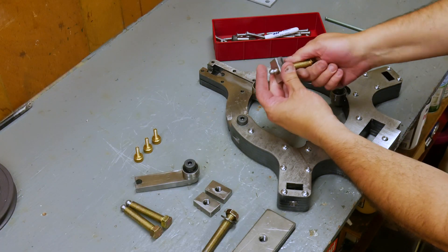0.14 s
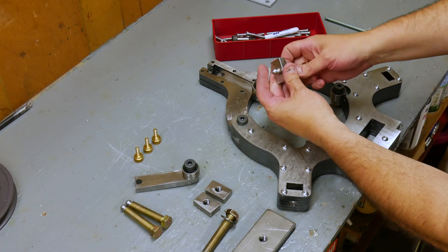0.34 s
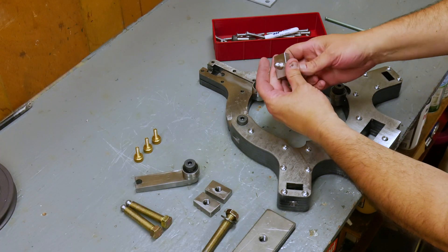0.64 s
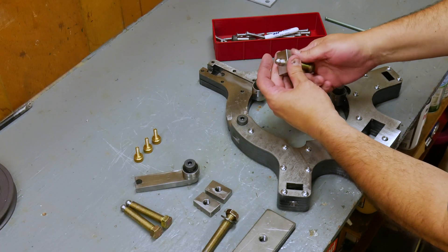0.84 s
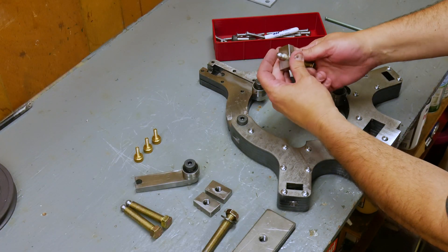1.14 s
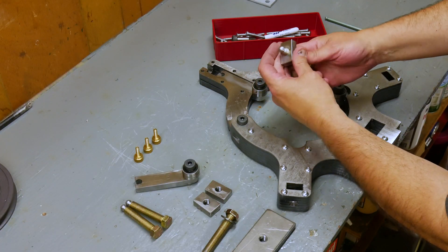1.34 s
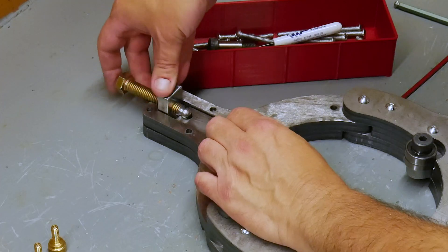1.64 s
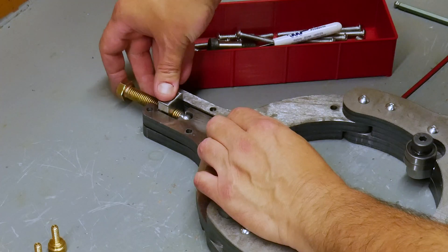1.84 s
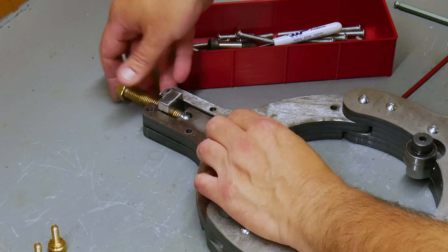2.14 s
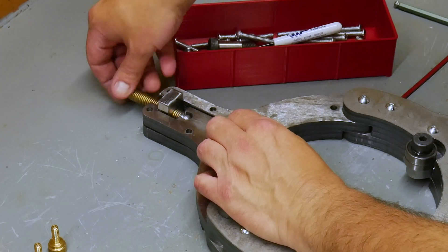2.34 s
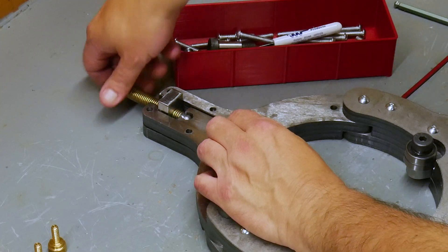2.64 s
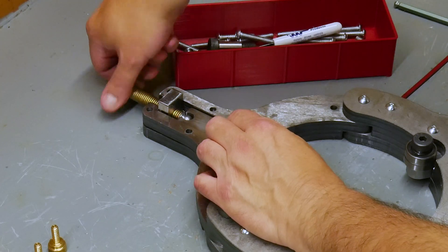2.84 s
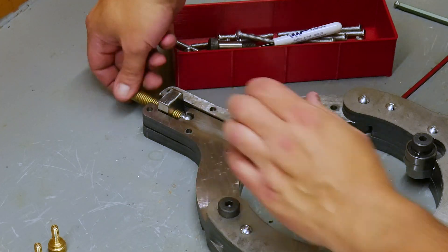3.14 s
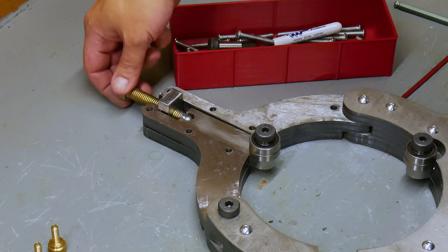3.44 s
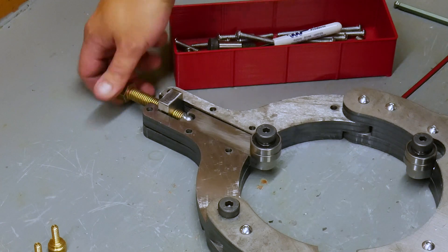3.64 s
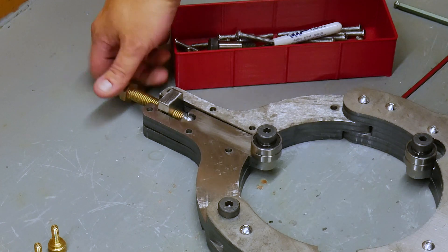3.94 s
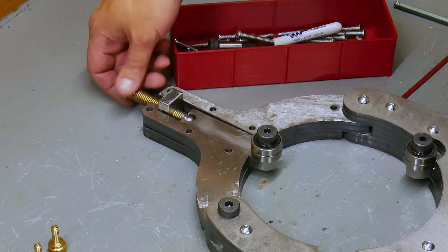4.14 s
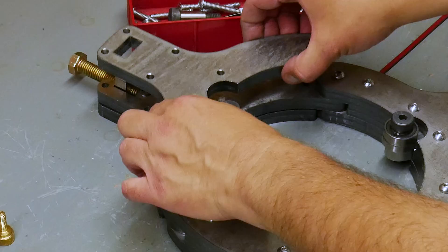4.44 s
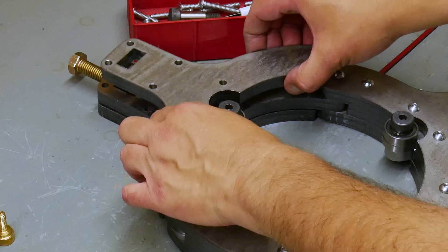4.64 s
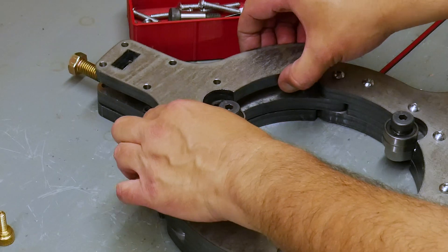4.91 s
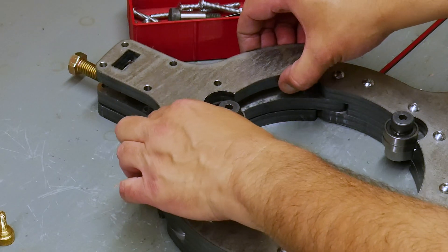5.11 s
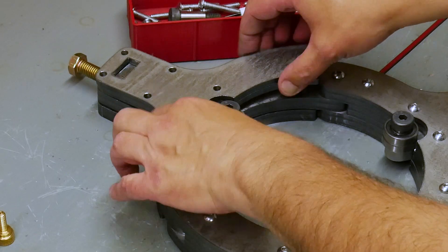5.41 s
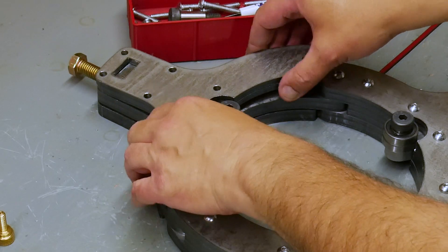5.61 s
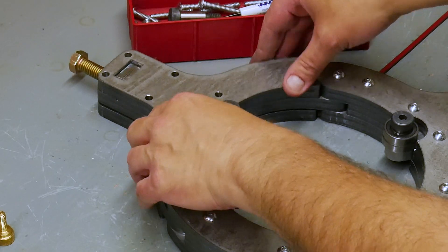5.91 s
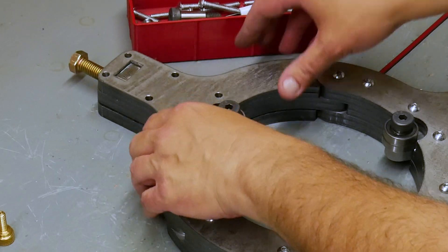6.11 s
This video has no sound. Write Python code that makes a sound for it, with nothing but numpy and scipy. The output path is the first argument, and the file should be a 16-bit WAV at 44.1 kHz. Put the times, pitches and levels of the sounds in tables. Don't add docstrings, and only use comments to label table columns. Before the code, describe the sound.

Close, nearly mono sound of hand assembly on a workbench: faint thread ticks, then one hard metal clank with a bench thud under suddenly louder ventilation noise. Light clicks and dull taps of the bolt cluster afterwards. When the air drops again, a heavy cover plate clatters and rings in two main bursts, its ring damped by gripping hands. Short indoor decay.

```python
import sys
import numpy as np
from scipy import signal
from scipy.fft import rfft, irfft
from scipy.io import wavfile
from scipy.ndimage import uniform_filter1d

SR = 44100
rng = np.random.default_rng(int(sys.argv[2]) if len(sys.argv) > 2 else 0)


def pcm_store(signal):
    levels = np.round(np.clip(np.atleast_2d(signal), -1, 1) * 32767)
    wavfile.write(sys.argv[1], SR, levels.astype(np.int16).T)


def nominal_scale(level):
    x = np.asarray(level, float) / 20
    return 10 ** x


N = 276507

# start in seconds, gain of the workshop air in dB.
SHOTS = [
    (0, -0.5),
    (1.51, 11),
    (4.5151, -0.35),
]
# start in seconds, levels of crack, block ring and shank ring in dB.
BOLT_HITS = [(0.78, -69, -57, -65), (1.274, -61, -54, -63), (1.9475, -52, -66, -45), (2.541, -61, -47, -40),
             (2.554, -45, -46, -51), (2.8759, -52, -54, -38), (2.9228, -54, -54, -40),
             (3.2093, -46, -50, -50), (3.2206, -41.5, -24, -36), (3.271, -43, -47, -31),
             (3.357, -51, -56, -56), (3.5393, -50, -55, -44), (3.6064, -38, -57, -27),
             (3.677, -46.5, -57, -50), (3.8164, -46, -42, -35.5), (3.848, -64, -45, -46),
             (3.8655, -40, -35.5, -42), (3.88, -46, -49, -45), (3.9253, -44.5, -54, -38),
             (4.1297, -43.5, -33, -36), (4.15, -44, -43, -51), (4.1634, -57, -53, -36),
             (4.2164, -45, -38, -40), (4.241, -47, -28, -38), (4.269, -57, -50, -38),
             (4.3385, -51, -55, -54), (4.471, -57, -45, -56), (4.4787, -45, -40.5, -34),
             (4.493, -57, -56, -32.5)]
# start in seconds, levels of crack, block ring and edge ring in dB,
# chatter in seconds.
DROP_HITS = [
    (1.7592, -46, -35, -70, .008),
    (1.7779, -21, -10, -45, .004),
    (1.7858, -29, -34, -36, .005),
]
# middle in seconds, length in seconds, rms level in dB.
TURNS = [
    (.145, .07, -75),
    (.475, .06, -72),
    (.775, .05, -71),
    (1.055, .07, -72),
    (3.57, .05, -60),
]
# start in seconds, ring level in dB, treble of the ring in dB, grip damping factor.
PLATE_HITS = [(4.634, -38, -18, 1.8), (4.9326, -36.5, -27, 3.9), (5.012, -61, -37, 2.1),
              (5.035, -50, -35, 2.9), (5.2314, -39.5, -23, 2.2), (5.3688, -38, -23.5, 1.2),
              (5.3877, -27.5, -17, 1.3), (5.4067, -19, -12, 3.4), (5.4138, -15.5, -39, 2.8),
              (5.421, -27, -6, 1.6), (5.4277, -28.5, -19, 3.1), (5.444, -37.5, -10, 3.3),
              (5.804, -49, -29, 1.9), (5.8313, -41, -18, 1.7), (5.8609, -26, -8, 3.5),
              (5.8687, -28, -40, 1.6), (5.8865, -28, -27, 2.9), (5.947, -22, -17, 3.2),
              (5.9822, -18.5, -12.5, 3.7)]
# start in seconds, level in dB, favoured pitch in Hz, chatter in seconds.
THUDS = [(1.7752, -9, 223, 0.0011), (2.546, -32.5, 590, 0.011), (2.889, -30, 148, 0.016),
         (3.218, -27, 406, 0.006), (3.25, -31, 175, 0.0053), (3.271, -31, 266, 0.0062),
         (3.522, -26.5, 288, 0.041), (3.551, -42, 292, 0.018), (3.599, -30, 510, 0.007),
         (3.677, -33, 527, 0.027), (3.85, -29, 536, 0.011), (3.871, -30.5, 285, 0.026),
         (4.165, -27, 154, 0.04), (4.208, -27.5, 170, 0.037), (4.238, -32.5, 388, 0.011),
         (4.478, -33.5, 377, 0.0061), (4.631, -37, 495, 0.011), (4.738, -43, 344, 0.014),
         (4.93, -33, 176, 0.013), (5.037, -38, 267, 0.018), (5.226, -35, 385, 0.0094),
         (5.256, -34.5, 182, 0.012), (5.371, -25.5, 570, 0.061), (5.401, -22.5, 257, 0.025),
         (5.82, -34.5, 269, 0.011), (5.836, -36.5, 264, 0.012), (5.859, -24, 346, 0.016),
         (5.874, -28, 490, 0.0074), (5.957, -31.5, 255, 0.0028), (5.979, -28, 507, 0.022)]

# frequency in Hz, level in dB, t60 in seconds.
BLOCK_MODES = [(5720, 0, .03), (5810, -4, .04), (5100, -18, .02), (6400, -20, .02), (7300, -26, .03),
               (8300, -28, .03), (14900, -38, .04)]
EDGE_MODES = [(11200, -3, 0.11), (11470, -5.5, 0.088), (12300, -12, .08)]
SHANK_MODES = [(2997, 3, 0.024), (3454, -2, 0.022), (4450, -10, 0.045), (5226, -3.5, 0.0503),
               (2220, -9, 0.028)]
THREAD_MODES = [(5830, 0, .03), (14900, -25, .05)]
PLATE_MODES = [(2470, -15, .1), (2650, -12, .14), (2950, -13, .14), (3260, -7, .24), (3560, -8, .14),
               (4475, -3, .3), (4540, -5, .26), (4810, -9, .18), (5070, -6, .16), (5220, -5, .18),
               (5700, 3, .12), (5980, -5, .14), (6370, -6, .16), (6680, -16, .2), (7110, -10, .17),
               (8120, -4, .22), (8150, -5, .22), (8480, -15, .11), (9410, -13, .2), (9860, -13, .26),
               (10600, -18, .12), (11580, -9, .12), (12310, -15, .3), (12740, -10, .3), (13300, -22, .12),
               (14250, -17, .24), (15270, -22, .3)]
BENCH_MODES = [(158.2, -13, 0.24), (190, -1, 0.069), (274.4, 3.5, 0.0457), (403, 6, 0.034), (499, 3, 0.042),
               (650, -3, 0.067), (815, 12, 0.016), (1082, 0.5, 0.052), (1363, -3.5, 0.12), (1512, 2, 0.037),
               (2090, -14, 0.22)]
LEGS_MODES = [(70, 0, 0.075), (97.4, 0, 0.15)]
# frequency in Hz, level in dB.
STEEL_COLOUR = [(300, -24.5), (900, -15), (2000, -7), (3200, 0), (5000, -2), (7000, -12.5), (10000, -20.5),
                (15600, -29), (16400, -74.5)]
BOARD_COLOUR = [(90, -17), (160, 6.5), (400, -3), (1100, 0), (2200, -3.5), (3500, -17.5), (6000, -36)]
# frequency in Hz, t60 in seconds.
ROOM_T60 = [(150, 0.16), (1000, 0.63), (4000, 0.28), (12000, 0.27)]
# frequency in Hz, density in dB per Hz.
AIR_COLOUR = [(12, -52), (26, -2.5), (100, -12.5), (135, -12), (270, -7.5), (600, -5), (1290, -4),
              (2100, -9.5), (3300, -14.5), (4600, -22), (6000, -25.5), (7520, -36.5), (14700, -44),
              (16000, -53.5)]
# frequency in Hz, width in Hz, level in dB.
FAN_HUMS = [(59, 5.97, -80), (93.3, 7.64, -75), (280.4, 26.6, -68.5), (569.4, 16, -68), (1355, 128, -69.5)]
# frequency in Hz, level in dB.
SIDE_COLOUR = [(30, -20.5), (150, -24), (1000, -32), (3000, -23), (10000, -5)]
# frequency in Hz, level in dB.
FLOOR = [(3000, -40), (6000, -22), (9000, -12.5), (11800, -21), (12500, 5.5), (15400, -0.5),
         (16000, 20.5)]
# frequency in Hz, level against the local spectrum in dB.
RELATIVE_FLOOR = [(3000, -19), (5500, -16), (7000, -8.5), (10000, -7), (15000, 3.5)]
# levels of crack, block ring and shank ring in dB.
CATCH_DB = (-74, -67, -70)

CATCH_SPREAD = 0.26
BOLT_CHATTER_S, PLATE_CHATTER_S = 0.0047, 0.0045
EDGE_UNDER_CRACK_DB, DROP_SHANK_DB = -23, -36
LOW_LINES_DB, HARD_KNEE_DB, LOW_LOSS_DB_PER_DB = -3.5, -29.5, 4
FULL_BLOW_DB, NARROWING_DB_PER_OCTAVE_PER_DB = -6.5, 0.18
LEGS_DB = -23
ROOM_DB = -16.5
AIR_DB, SWELL_DB = -54, 0.4
SIDE_KEPT, SIDE_HIT_DB = 0.4, -11
FLOOR_DB, STARVED_DB = -107, 6.0


def shaped(x, points):
    hz, db = np.transpose(points)
    f = np.fft.rfftfreq(x.shape[-1], 1 / SR) + 0.00071
    gain_db = np.interp(np.log(f), np.log(hz), db)
    return irfft(rfft(x) * nominal_scale(gain_db), x.shape[-1])


def unit(x):
    return x / np.sqrt(np.mean(x ** 2))


def walk(rate_hz):
    hold = int(SR / rate_hz)
    steps = np.repeat(rng.standard_normal(N // hold + 1), hold)
    return 2.3 * uniform_filter1d(uniform_filter1d(steps, hold), hold)[:N]


def add(track, s, sound):
    i = int(s * SR)
    track[i:i + len(sound)] += sound[:N - i]


def ring(modes, scatter_db, tilt_db=0., damping=0.94, contact_ms=0.24):
    hz, db, t60 = np.transpose(modes)[:, :, None]
    damping = max(damping, .2)
    t = np.arange(int(min(.25, t60.max() / damping) * SR)) / SR
    chance = rng.standard_normal((2, len(hz), 1))
    level = nominal_scale(db + tilt_db + scatter_db * chance[0])
    waves = level * np.sin(2 * np.pi * hz * (1 + 0.0012 * chance[1]) * t)
    y = (waves * np.exp(-np.log(1000) * t * damping / t60)).sum(axis=0)
    y = y * (1 - np.exp(-t * 1000 / contact_ms))
    return np.pad(y / np.abs(y).max(), (0, int(.25 * SR) - len(t)))


def crack(colour, ms, tail_ms, tail_db, contact_ms=0.19):
    t = np.arange(int(.25 * SR)) / SR
    fade = np.exp(-t * 1000 / ms) + nominal_scale(tail_db) * np.exp(-t * 1000 / tail_ms)
    push = (1 - np.exp(-t * 1000 / contact_ms)) ** 2
    return unit(shaped(rng.standard_normal(len(t)), colour)) * fade * push / 2


def chatter(length_s, rate_hz):
    t = np.arange(int(.08 * SR)) / SR
    when, size = rng.random(len(t)), rng.standard_normal(len(t))
    x = (when < rate_hz / SR) * 0.36 * size * np.exp(-t / max(length_s, 1e-4))
    x[0] = 1
    return x / np.sqrt(np.sum(x ** 2))


def bolt():
    out = np.zeros(N)
    catches = []
    for s, length_s, _ in TURNS[:4]:
        for side in (-1, 1):
            catches.append((s + side * CATCH_SPREAD * length_s, *CATCH_DB))
    hits = []
    for s, crack_db, block_db, shank_db in catches + list(BOLT_HITS):
        hits.append((s, crack_db, block_db, shank_db, crack_db + EDGE_UNDER_CRACK_DB, BOLT_CHATTER_S))
    for s, crack_db, block_db, edge_db, length_s in DROP_HITS:
        hits.append((s, crack_db, block_db, crack_db + DROP_SHANK_DB, edge_db, length_s))
    for s, crack_db, block_db, shank_db, edge_db, length_s in hits:
        body = nominal_scale(block_db) * ring(BLOCK_MODES, 2.5)
        body = body + nominal_scale(shank_db) * ring(SHANK_MODES, 2.5)
        body = body + nominal_scale(edge_db) * ring(EDGE_MODES, 2.5)
        body = body + nominal_scale(crack_db + 8.0) * crack(STEEL_COLOUR, 1.8, 22.0, -9.5)
        add(out, s, signal.fftconvolve(body, chatter(length_s, 900)))
    return out


def thread():
    out = np.zeros(N)
    for s, length_s, db in TURNS:
        n = int(length_s * SR)
        slips = rng.standard_normal(n) ** 3 * np.hanning(n)
        song = signal.fftconvolve(slips, ring(THREAD_MODES, 1.))[:n + 400]
        add(out, s - length_s / 2, nominal_scale(db) * unit(song))
    return out


def plate():
    out, hz = np.zeros(N), np.array(PLATE_MODES)[:, :1]
    for s, db, treble_db, grip in PLATE_HITS:
        low_db = LOW_LINES_DB - LOW_LOSS_DB_PER_DB * max(db - HARD_KNEE_DB, 0)

        def tilt(f):
            treble = (treble_db + 11.5) * np.clip(np.log2(f / 6000), 0, 1)
            return treble + (low_db + 20.5) * np.clip(np.log2(5000 / f), 0, 1)

        lines = ring(PLATE_MODES, 1.8, tilt(hz), grip)
        clatter = crack([(f, d + 0.42 * tilt(f)) for f, d in STEEL_COLOUR], 3.6, 32.0, -14.5)
        body = lines + nominal_scale(2.9 * (grip - 2.5)) * clatter
        add(out, s, nominal_scale(db) * signal.fftconvolve(body, chatter(PLATE_CHATTER_S, 1700)))
    return out


def bench():
    out, hz = np.zeros(N), np.array(BENCH_MODES)[:, :1]
    for s, db, favoured_hz, length_s in THUDS:
        spread_db = NARROWING_DB_PER_OCTAVE_PER_DB * (FULL_BLOW_DB - db)

        def tilt(f):
            return -np.abs(spread_db * np.log2(f / favoured_hz))

        modes = ring(BENCH_MODES, 2.5, tilt(hz), contact_ms=.6)
        colour = [(f, d + tilt(f)) for f, d in BOARD_COLOUR]
        board = crack(colour, 2.77, 34.0, -10.5, contact_ms=1.0)
        thud = signal.fftconvolve(modes + nominal_scale(-0.5) * board, chatter(length_s, 460))
        add(out, s + 0.00203, nominal_scale(db) * thud)
    return signal.sosfilt(signal.butter(4, 130, "high", fs=SR, output="sos"), out)


def legs():
    out = np.zeros(N)
    for s, db, _, _ in THUDS[21:]:
        add(out, s, nominal_scale(db + LEGS_DB) * ring(LEGS_MODES, 2.5, contact_ms=5.1))
    return out


def room():
    t, tail = np.arange(int(.4 * SR)) / SR, 0
    hz, t60 = np.transpose(ROOM_T60)
    for centre in 90 * 2. ** np.arange(8):
        edges = [centre / 2 ** .5, centre * 2 ** .5]
        band = signal.butter(2, edges, "band", fs=SR, output="sos")
        octave = signal.sosfilt(band, rng.standard_normal(len(t)))
        tail = tail + octave * np.exp(-np.log(1000) * t / np.interp(np.log(centre), np.log(hz), t60))
    return unit(tail * (1 - np.exp(-t / 0.004))) / np.sqrt(len(t))


def air():
    roar, hums = 0, 0
    swell, f = walk(0.15), np.fft.rfftfreq(N, 1 / SR) + 1
    broad = rfft(shaped(rng.standard_normal(N), AIR_COLOUR))
    for centre in 20 * 2. ** np.arange(11):
        share = np.clip(1 - np.abs(np.log2(f / centre)), 0, 1)
        roar = roar + irfft(broad * share, N) * nominal_scale(SWELL_DB * swell + .5 * walk(14.0))
    for hz, width_hz, db in FAN_HUMS:
        resonance = 1 / (1 + 2j * (f - hz) / width_hz)
        hums = hums + nominal_scale(db) * unit(irfft(rfft(rng.standard_normal(N)) * resonance, N))
    return nominal_scale(AIR_DB) * unit(roar) + hums


def scene():
    start_s, gain_db = np.transpose(SHOTS)
    shot = np.searchsorted(start_s * SR, np.arange(N), side="right") - 1
    gain = uniform_filter1d(nominal_scale(gain_db[shot]), size=90)
    early, late = shot < 2, shot == 2
    knocks = bench()
    dry = (bolt() + knocks) * early + (plate() + knocks + legs()) * late
    tail = room()
    wet = sum(part * signal.fftconvolve(dry * part, tail)[:N] for part in (early, late))
    mid = dry + nominal_scale(ROOM_DB) * wet + gain * air() + thread()

    other_air = nominal_scale(AIR_DB) * unit(shaped(rng.standard_normal(N), AIR_COLOUR))
    frames = np.repeat(rng.random(N // 1024 + 1) < SIDE_KEPT, 1024)[:N] + .22
    frames = uniform_filter1d(frames, size=600)
    blur = rng.standard_normal(400) / 20
    side_hits = signal.fftconvolve(dry, blur)[:N] * nominal_scale(SIDE_HIT_DB)
    side = shaped(side_hits + frames * gain * other_air, SIDE_COLOUR)
    return np.array([mid + side, mid - side])


def drop_faint_treble(x):
    f, _, cells = signal.stft(x, SR, nperseg=2048)
    size = np.abs(cells.mean(axis=0))
    wander = np.repeat(rng.standard_normal((65, size.shape[1])), 16, axis=0)[:len(f)]
    wander = (wander + np.roll(wander, 1, axis=1)) / 2 ** .5
    floor_shape_db = np.interp(f, *np.transpose(FLOOR))[:, None]
    relative_db = np.interp(f, *np.transpose(RELATIVE_FLOOR))[:, None]
    quiet = nominal_scale(FLOOR_DB + floor_shape_db + 2.5 * wander)
    under_local = uniform_filter1d(size, size=32, axis=0) * nominal_scale(relative_db + STARVED_DB * wander)
    kept = size > np.maximum(quiet, under_local)
    return signal.istft(cells * kept, SR, nperseg=2048)[1][:, :N]


def roll_off(x):
    return signal.sosfilt(signal.butter(12, 16310, fs=SR, output="sos"), x)


def record(dry):
    mix = drop_faint_treble(dry)
    return roll_off(mix)


dry = scene()
out = record(dry)
pcm_store(out)
```